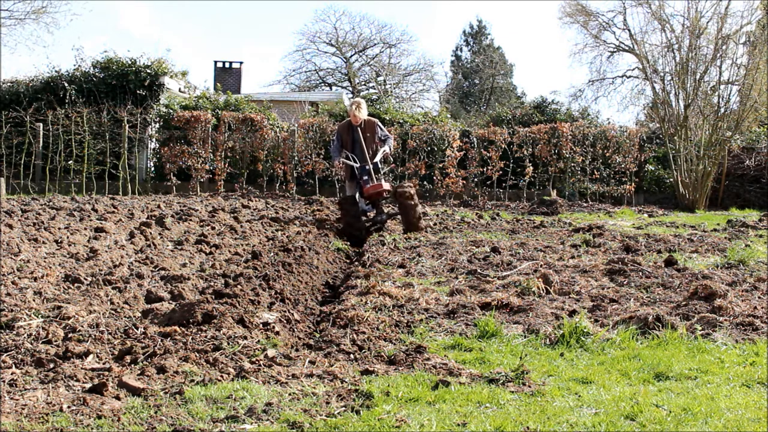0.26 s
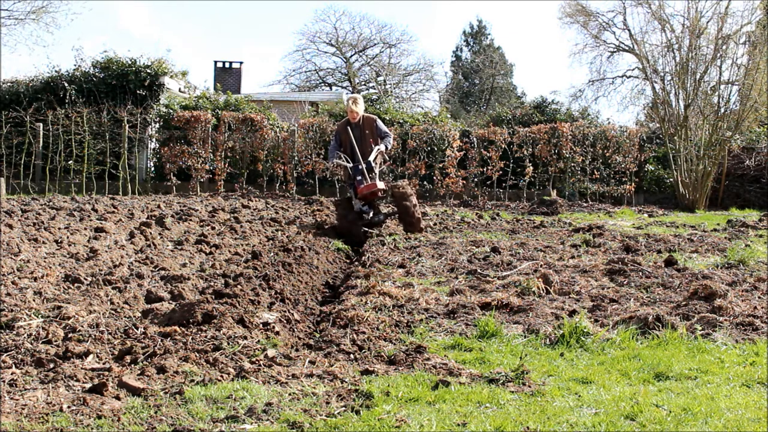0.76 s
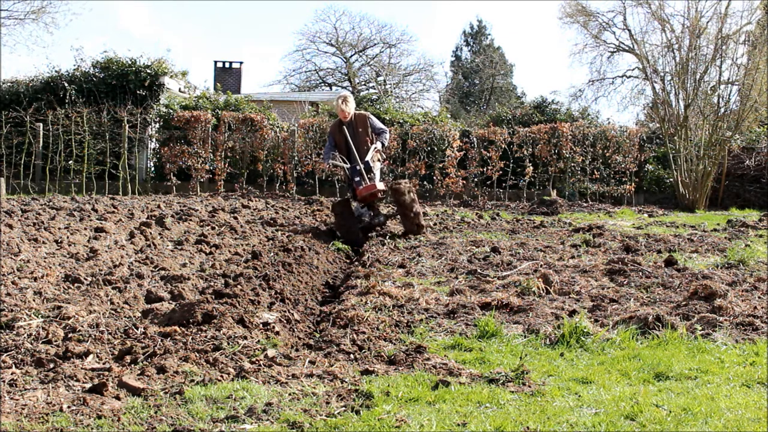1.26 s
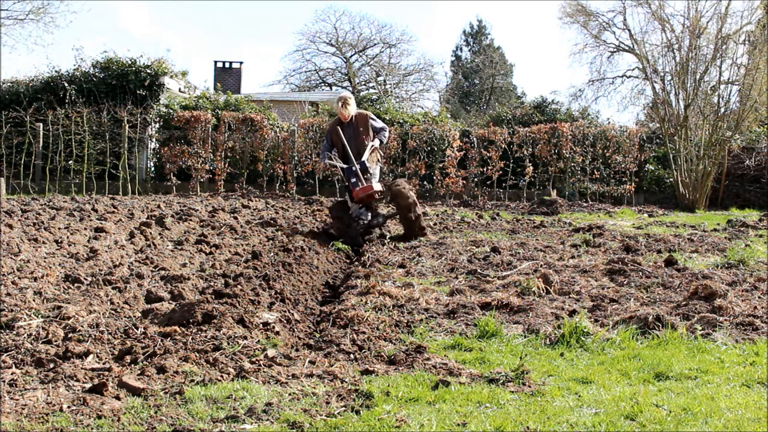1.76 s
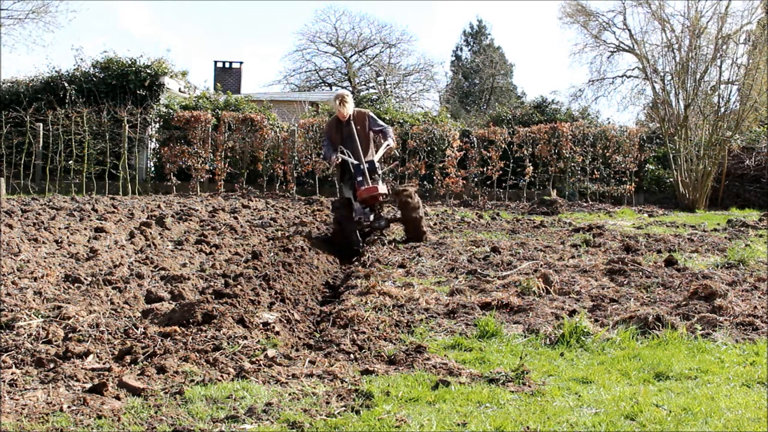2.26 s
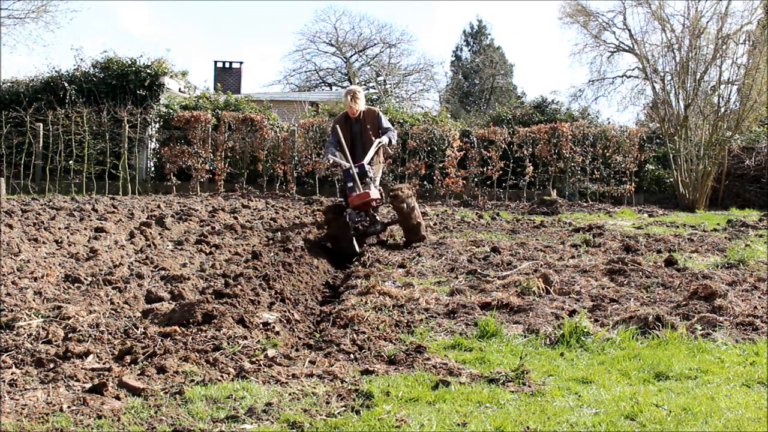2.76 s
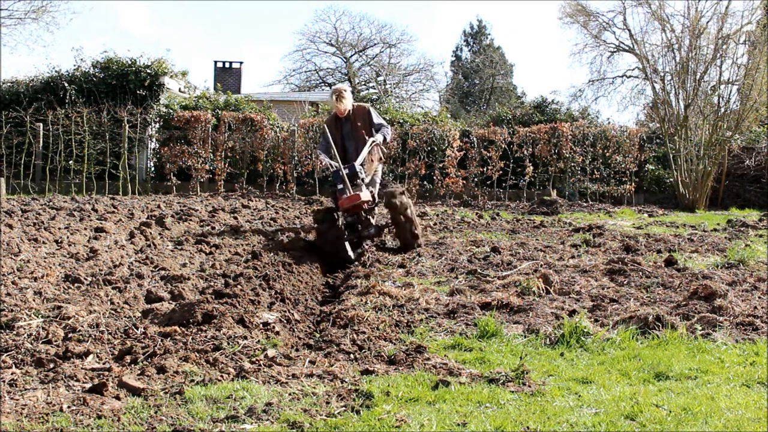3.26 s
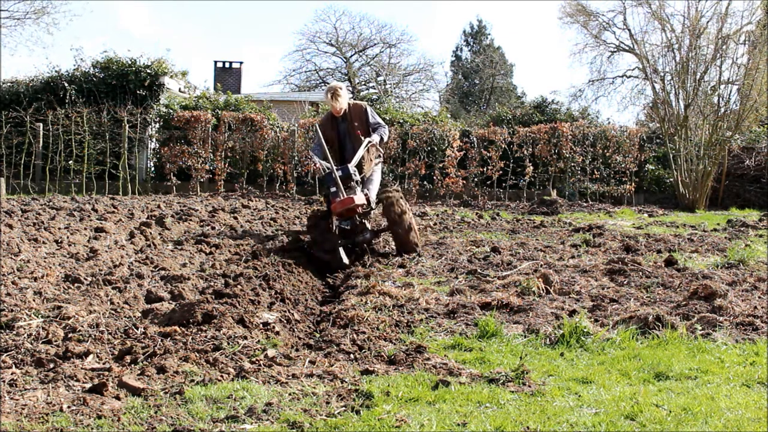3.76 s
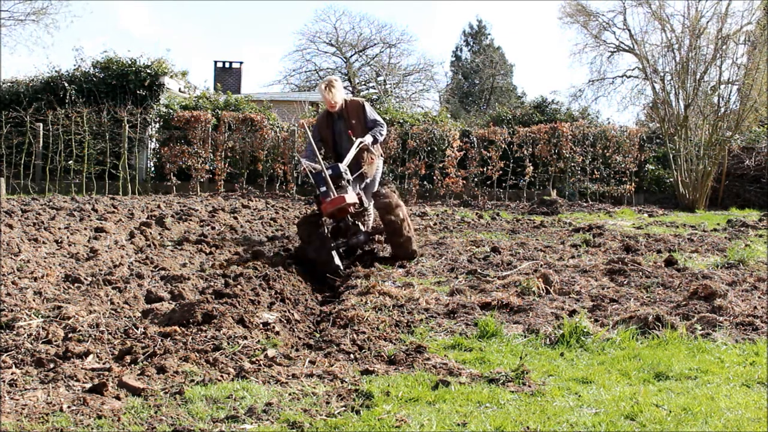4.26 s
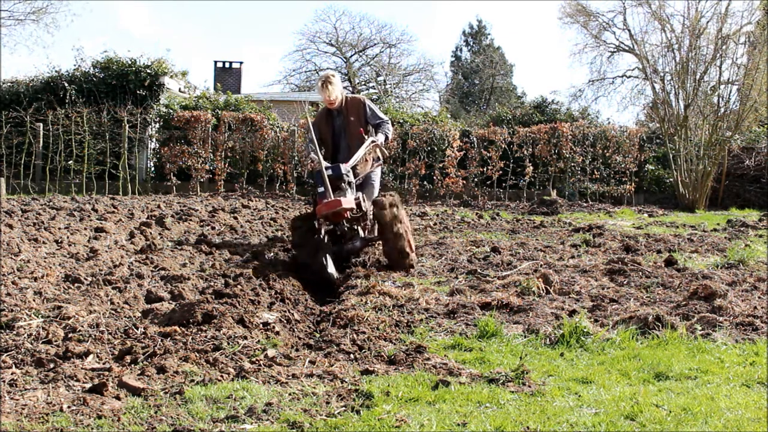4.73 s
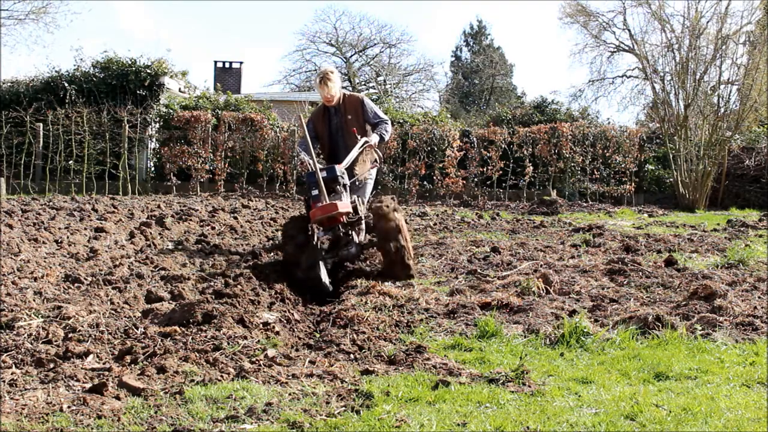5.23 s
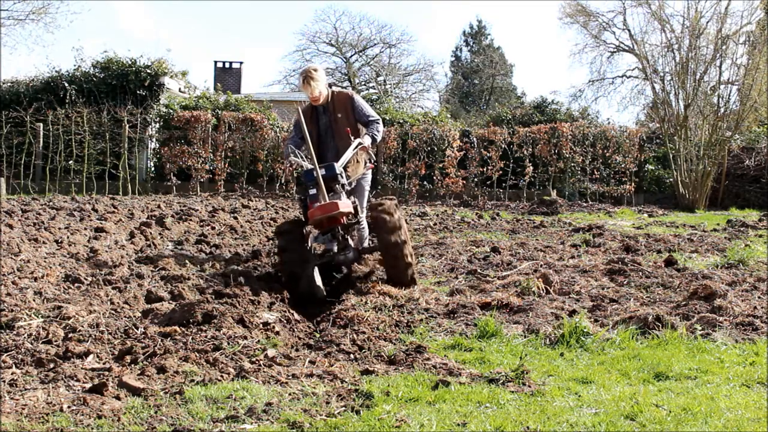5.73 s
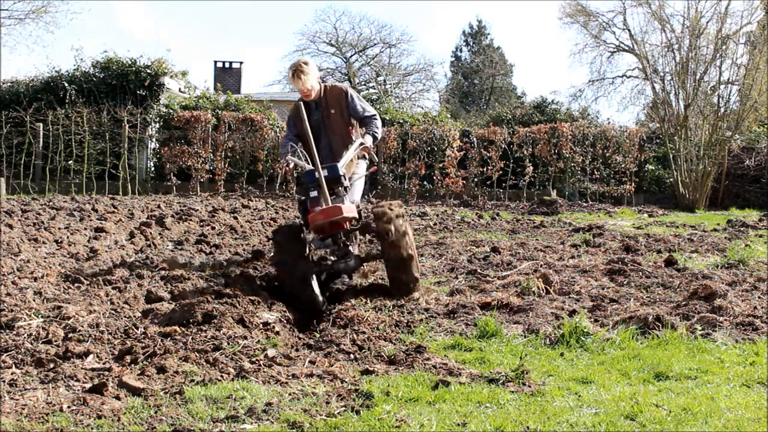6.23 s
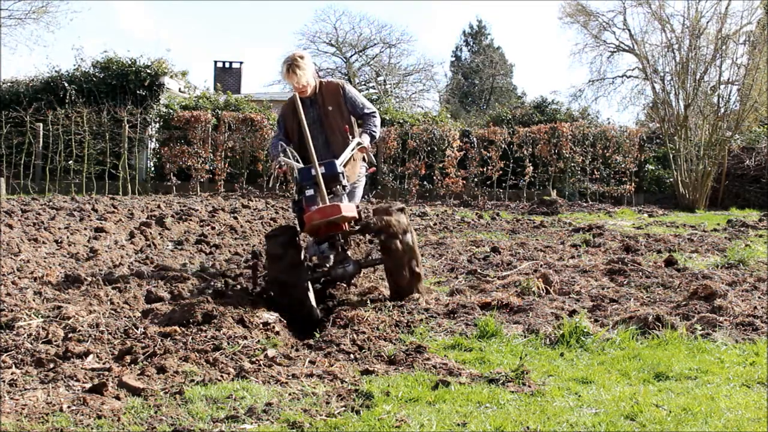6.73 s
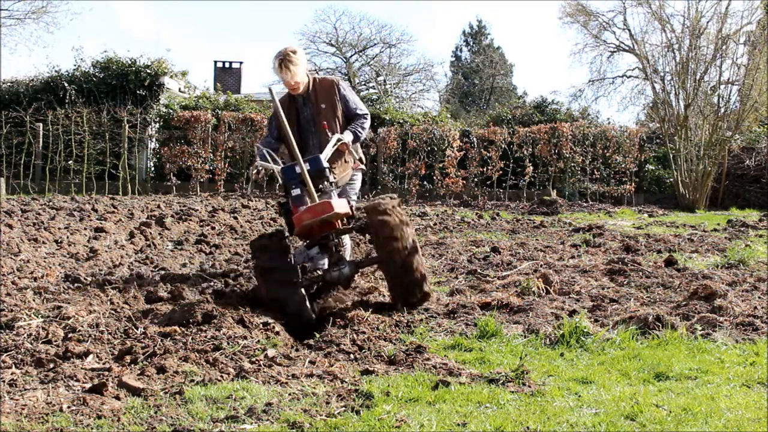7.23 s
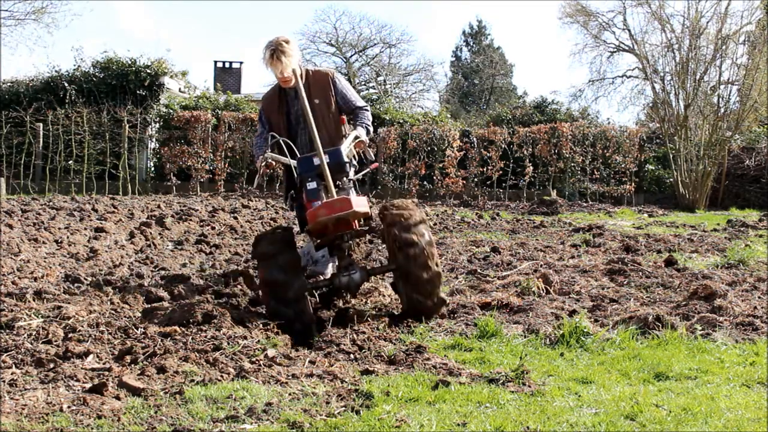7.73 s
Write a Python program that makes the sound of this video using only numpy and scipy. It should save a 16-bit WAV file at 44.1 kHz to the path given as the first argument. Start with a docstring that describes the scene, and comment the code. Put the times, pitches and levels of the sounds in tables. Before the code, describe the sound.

Walking tractor ploughing nearer: rapid hoarse exhaust chug, bending gear whine and metallic rattle, repeatedly swamped by low wind thuds overloading the microphone.

```python
"""Windy field: a one-cylinder four-stroke walking tractor ploughs toward a small stereo microphone.
Its governor hunts: speed sags, the throttle opens, the exhaust barks and the gear whine bends.
Tones make exhaust and whine; struck modes make clatter; filtered noise makes the roar.
Low noise and single puffs buffet the two microphone ports; loud moments trip a quick limiter."""
import sys
import numpy as np
from scipy import signal
from scipy.fft import rfft, irfft
from scipy.io import wavfile
from scipy.ndimage import uniform_filter1d

SR = 44100
rng = np.random.default_rng(int(sys.argv[2]) if len(sys.argv) > 2 else 0)


def wav_out(sig):
    """Save sig, one row per channel (or a flat mono array), as 16-bit PCM at SR to the path in sys.argv[1]."""
    wavfile.write(sys.argv[1], SR, np.round(np.clip(np.atleast_2d(sig).T, -1, 1) * 32767).astype(np.int16))


N = 352359
T = np.arange(N) / SR

# Governor swings, sag to sag. Each row: start in seconds, lowest firings per s, highest firings per s.
GOVERNOR_SWINGS = [(-0.054, 28.79, 30.0), (0.355, 27.99, 29.84), (0.783, 27.96, 29.98),
                   (1.178, 27.89, 29.64), (1.53, 27.72, 29.23), (1.918, 28.58, 29.09),
                   (2.205, 28.94, 29.36), (2.62, 28.96, 29.3), (2.902, 28.9, 30.13), (3.289, 28.02, 29.63),
                   (3.707, 28.5, 29.94), (4.123, 27.89, 29.22), (4.362, 28.96, 29.72),
                   (4.844, 28.14, 30.22), (5.227, 28.55, 29.93), (5.641, 27.65, 30.11),
                   (6.128, 27.42, 29.73), (6.568, 27.42, 29.78), (6.997, 27.54, 29.94),
                   (7.446, 27.68, 29.87), (7.904, 27.44, 29.99), (8.558, 29.0, 29.0)]
# Recorder gain on the machine, pushed down by wind, at times abruptly, and recovering.
# Each row: time in seconds, relative gain in dB.
RECORDER_GAIN = [(0, -27), (.85, -26.5), (1.3, -27.5), (1.34, -35), (1.51, -37.5), (1.54, -31.5),
                 (1.8, -35), (2.09, -29.5), (2.27, -44), (2.6, -42), (3.3, -33.5), (4.14, -27), (4.18, -26),
                 (5.05, -26), (5.1, -31), (5.35, -29.5), (6.54, -30.5), (6.61, -27.5), (7.99, -26)]
# Brief dips of the recorder gain. Each row: centre in seconds, depth in dB, bell width in seconds.
GAIN_DIPS = [(1.09, 4, 0.021), (1.18, 1, 0.0085), (1.38, 6.5, 0.017), (1.44, 0.5, 0.013), (1.69, 7, 0.041),
             (2.42, 2.5, 0.014), (3.27, 4, 0.015), (3.745, 4, 0.022), (4.3, 5, 0.02), (4.885, 6.5, 0.027),
             (5.08, 3.5, 0.028), (5.58, 3.5, 0.045), (6.16, 3.5, 0.018), (6.38, 1.5, 0.038),
             (7.86, 2, 0.024)]
# Mix as the machine nears. Each row: time in seconds, then changes in dB of lower whine, upper whine,
# roar, valves, upper exhaust tones, and bark of the open throttle.
APPROACH_MIX = [(0, 2.5, 0.5, 2.5, 1, -10, -2), (1.2, 2.5, -3, 0.5, -1, -5, 3),
                (2.5, 0.5, -9.5, 1, -2, -6, 2), (4, -0.5, -1.5, 1.5, 1, -3, 2.5),
                (5.5, -1.5, -2.5, 3, -1.5, -3, 3.5), (6.5, -0.8, -1.5, 1.5, -5.5, 2, 0),
                (7.2, -1.5, 0, 2, -4, -1, 3.5), (7.99, -1, 0.5, 1.5, -6, 2.5, 1)]
# Exhaust tones, throttle nearly shut. Each row: multiple of the firing rate, relative level in dB.
EXHAUST_SHUT = [(1, -30), (2, -8.5), (3, -22), (4, -10.5), (5, 1.9), (6, -7.5), (7, -8.5), (8, 0.5),
                (9, -7), (10, -6.5), (11, -10), (12, -10), (13, -38), (14, -23), (15, -19), (16, -19),
                (17, -16.5), (18, -17), (19, -16), (20, -26), (21, -15), (22, -16), (23, -18), (24, -36)]
# Exhaust tones, throttle wide open. Each row: multiple of the firing rate, relative level in dB.
EXHAUST_OPEN = [(1, -25), (2, -11.5), (3, -26), (4, -8), (5, -2), (6, -0.5), (7, -2.5), (8, -8), (9, 1.5),
                (10, -3.5), (11, -12), (12, -12.5), (13, -10), (14, -8), (15, -34), (16, -52), (17, -18.5),
                (18, -18.5), (19, -10), (20, -23), (21, -20), (22, -21), (23, -21), (24, -23)]
# Gear teeth near housing resonances. Each row: multiple of the firing rate, tremble width in Hz,
# relative level in dB, housing resonance in Hz, its half-width in Hz.
GEAR_TEETH = [(80.15, 60, -5.5, 2330, 200), (119.6, 75, -9, 3420, 150), (73.3, 80, -15, 2120, 120)]
# Casing and cover modes. Each row: frequency in Hz, width in Hz, relative level in dB.
CASING_MODES = [(1221, 223, -2.5), (1524, 271, -3), (1724, 63, 0.5), (2137, 182, -4), (2372, 138, -2),
                (2677, 160, -5.5), (2914, 80, -7), (3393, 242, -4.5), (4170, 500, -14), (4615, 106, -15.5),
                (4960, 89, -19), (5450, 130, -20.5), (5890, 133, -18), (6960, 250, -21), (8460, 200, -33.5),
                (9200, 330, -60), (10440, 190, -37), (12300, 600, -55), (14200, 500, -76)]
# Engine block modes rung by the firing. Each row: frequency in Hz, width in Hz,
# relative level in dB before weighting by root width.
BLOCK_MODES = [(1300, 66, -26), (1484, 76, 6.5), (3424, 69, -0.5), (4140, 95, -9.5), (4700, 120, -14),
               (5080, 100, -7.5), (5440, 130, -10), (5970, 88, -10), (6600, 130, -21), (7120, 180, -13),
               (8120, 200, -26), (8310, 110, -19.5)]
# Modes rung by a valve tick. Each row: frequency in Hz, width in Hz, relative level in dB.
VALVE_MODES = [(2748, 88, 15.5), (2730, 130, 11), (2610, 100, 0.5), (2914, 110, -2)]
# Bursts of hard knocking. Each row: centre in seconds, extra level in dB, bell width in seconds.
KNOCK_BURSTS = [(.12, 9, 0.1), (.43, 2, .08), (1.21, 6.5, 0.034), (3.34, 9, .04), (3.69, 11.5, 0.058),
                (4.19, 7.5, 0.04), (4.84, 11, 0.048), (5.74, 5, .04), (6.21, 8.5, 0.034), (6.62, 6, 0.03),
                (7.055, 11.5, 0.082), (7.48, 6, 0.1), (7.93, 5, .05)]
# Roar of cooling air and exhaust gas. Each row: frequency in Hz, relative density in dB per Hz.
ROAR_SPECTRUM = [(25, -22), (60, -13.5), (150, -22), (280, -20), (450, -21), (700, -22), (1400, -33.5),
                 (3000, -42), (5000, -37.5), (9000, -44.5), (13000, -57.5), (15600, -66)]
# Bands cancelled by the soil echo. Each row: frequency in Hz, half-width in Hz, depth 0-1.
SOIL_NOTCHES = [(665, 74, 0.52), (1920, 58, 0.15), (3170, 34, 0.37), (4310, 96, 0), (6270, 65, 0.5)]
# Left-right likeness of the machine. Each row: frequency in Hz, likeness 0-1.
PORT_LIKENESS = [(60, 0.65), (300, 1), (1400, 0.98), (2400, 0.9), (3400, 0.82), (6800, 0.74), (15000, 0.83)]
# Channel balance of the machine. Each row: frequency in Hz, left minus right in dB.
PORT_BALANCE = [(60, 7.5), (180, 0), (550, -3), (1650, -2), (4970, 1.5), (15000, -0.5)]
# Gusts. Each row: start in seconds, length in seconds, relative level in dB,
# level in dB of the part above the thud range relative to that.
GUST_ROWS = [(0.023, 0.26, -27, -16), (0.552, 0.38, -29, -15), (0.974, 0.21, -35, -21),
             (1.2, 0.28, -24.5, -15), (1.52, 0.081, -19, -11.5), (1.629, 0.058, -21.5, 3),
             (1.705, 0.1, -28, -5.5), (1.84, 0.29, -30, -15), (2.113, 0.21, -26, 5),
             (2.352, 0.51, -30, 4.5), (3.222, 0.48, -39, -22), (3.64, 0.11, -29.5, -11),
             (3.844, 0.55, -38, -16), (4.235, 0.068, -20, -9), (4.398, 0.4, -33, -16),
             (4.807, 0.19, -23.5, -16), (5.005, 0.428, -21, -11.5), (5.493, 0.4, -32, -17),
             (5.91, 0.34, -29.5, 2.5), (6.269, 0.081, -27, 8), (6.405, 0.21, -27, 0.5),
             (6.645, 0.27, -31, -13), (7.243, 0.29, -32, -12), (7.734, 0.14, -26.5, -9)]
# Buffeting noise. Each row: frequency in Hz, relative density in dB per Hz.
BUFFET_SPECTRUM = [(18, -54), (30, -37), (47, -14.5), (112, 5), (265, 2), (377, -5), (650, -17.5),
                   (850, -28), (1270, -33), (2000, -46), (2600, -92), (4400, -120)]
# Single puffs. Each row: time in seconds, relative level in dB, centre pitch in Hz, nominal length in ms,
# lean from right -1 to left +1.
PUFF_ROWS = [(0.203, -10, 206, 5.5, -0.17), (0.25, -8, 140, 5, -0.17), (0.865, -14, 156, 11, -0.37),
             (1.081, -11.5, 235, 2.5, -0.7), (1.289, -15, 155, 13, 0.37), (1.306, -10, 221, 8.3, 0.068),
             (1.327, -9.5, 210, 21, -0.44), (1.353, -10, 297, 4.1, -0.39), (1.427, -11.5, 222, 7.6, -0.51),
             (1.48, -11.5, 191, 9.1, -0.32), (1.552, -11, 227, 7.1, -0.41), (1.583, -17, 189, 9.1, 0.2),
             (1.623, -16, 210, 6.5, 0.2), (1.637, -12, 300, 3.1, -0.42), (1.664, -14, 420, 2.7, -0.47),
             (1.652, -10.5, 338, 14, -0.27), (1.679, -6, 282, 1.8, -0.39), (1.753, -23, 277, 5.3, 0.38),
             (1.777, -18, 196, 5.6, 0.47), (2.127, -18.5, 230, 8.8, 0.48), (2.152, -15.5, 289, 8.9, -0.29),
             (2.234, -12.5, 344, 5.1, -0.36), (2.265, -16, 420, 3.4, -0.28), (2.31, -17, 415, 4.9, -0.42),
             (2.333, -20, 384, 9.1, -0.41), (2.361, -13, 480, 2.4, -0.47), (2.397, -8.5, 344, 2.8, -0.25),
             (2.415, -17, 257, 7.1, -0.29), (2.457, -17.5, 373, 3.9, -0.39), (2.48, -18.5, 320, 14, -0.47),
             (2.509, -21, 400, 1.6, -0.51), (2.537, -17.5, 258, 4.4, 0.8), (2.558, -11, 380, 1.9, -0.3),
             (2.586, -17, 380, 2.3, -0.39), (2.618, -12.5, 176, 15, 0.24), (2.642, -20, 348, 3.6, -0.28),
             (2.685, -18, 205, 11, -0.52), (2.708, -16.5, 323, 5.4, -0.33), (2.74, -20, 320, 7.1, -0.35),
             (2.77, -7, 226, 6, -0.12), (2.783, -20, 380, 3.5, -0.29), (2.84, -19, 196, 26, -0.51),
             (3.402, -20.5, 126, 39, 0.39), (3.567, -12.5, 187, 4.2, 0.49), (3.726, -7, 211, 3.2, 0.51),
             (4.272, -5, 203, 7.9, 0.26), (4.845, -17, 125, 8.5, 0.53), (4.867, -7.5, 207, 11, 0.19),
             (5.049, -9, 194, 16, -0.33), (5.09, -10, 182, 9.5, -0.49), (5.212, -11.5, 183, 39, -0.27),
             (5.528, -21, 139, 11, 0.43), (5.547, -15.5, 240, 2.4, 1), (5.558, -14, 260, 17, -0.37),
             (5.602, -9, 257, 3.7, -0.43), (5.667, -14, 142, 14, 0.53), (5.689, -13, 197, 6.1, -0.16),
             (5.766, -16, 222, 7.4, -0.44), (5.834, -16, 197, 8.2, -0.51), (5.922, -17, 302, 3.4, -0.73),
             (5.938, -20, 255, 15, -0.41), (5.96, -14, 367, 3.9, -0.44), (5.977, -17, 420, 2.2, -0.63),
             (6.047, -6.5, 234, 2.5, -0.27), (6.098, -10, 240, 4.1, 0.13), (6.121, -17, 280, 5, -0.6),
             (6.147, -9.5, 178, 8.2, 0.38), (6.263, -22, 330, 3.8, -0.3), (6.289, -15, 330, 5.4, 0.053),
             (6.32, -14, 427, 2, -0.48), (6.484, -15, 284, 1.7, -0.74), (7.309, -20.5, 160, 15, -0.5),
             (7.816, -12, 156, 9.4, 0.28), (7.835, -10, 256, 3.7, -0.21)]

CLIMB_SHARE = .443  # of a swing, spent gaining speed
THROTTLE_LAG_S, PULL_LAG_S, PULL_DB = 0.027, 0.087, 1  # the pull arrives later and lifts the clatter
RATTLES_PER_S, RATTLE_DB = 120, -12  # stray knocks on the block
SWELL_S, LULL_DB = 0.049, -48  # gust rise and fall; wind between gusts
LIMIT_DB, RELEASE_DB_PER_S, LIMITER_LAG_S = -15.5, 102.0, .008
OVERLOAD, BASS_CUT_HZ, EDGE_HZ = .52, 40, 15620


def tractor():
    """Exhaust, gear whine and clatter share one shaft speed; the throttle answers its sags."""
    hz = speed()
    throttle, pull = opening(hz, THROTTLE_LAG_S), opening(hz, PULL_LAG_S)
    turns = np.cumsum(hz) / SR + .92  # one turn = one firing cycle
    s, *columns = np.transpose(APPROACH_MIX)
    low_db, high_db, roar_db, valve_db, upper_db, bark_db = (np.interp(T, s, column) for column in columns)
    whine = gear_whine(hz, turns, pull, low_db, high_db)
    sound = gain_of(-5.5 + bark_db * throttle) * exhaust(turns, throttle, upper_db) + whine
    sound = sound + gain_of(PULL_DB * pull - 0.63) * clatter(turns, pull, roar_db, valve_db)
    return spread(sound * gain_of(recorder_gain_db()))


def speed():
    """Firings per s: each swing climbs from its low to a narrow top and falls back into a broad sag."""
    s, low, top = np.transpose(GOVERNOR_SWINGS)
    tops_s = s + CLIMB_SHARE * np.diff(s, append=s[-1] + 1)
    knots = np.ravel([s, tops_s], "F")
    step = np.interp(T, knots, np.arange(len(knots)))
    height = abs(np.sin(np.pi * step / 2)) ** 1.29  # 0 in the sags, 1 at the tops
    swing = (step // 2).astype(int)
    sag = np.round(step / 2).astype(int)
    return low[sag] + height * (top[swing] - low[sag])


def opening(hz, lag_s):
    """Throttle opening 0-1, set by how slow the shaft was lag_s ago."""
    return np.clip((29.1 - np.interp(T - lag_s, T, hz)) / 0.66, 0, 1)


def exhaust(turns, throttle, upper_db):
    """Tones at multiples of the firing rate; uneven burns shake their strength and timing."""
    turns = turns + .0012 * drift(.04)
    out = np.zeros(N)
    for (k, shut_db), (_, open_db) in zip(EXHAUST_SHUT, EXHAUST_OPEN):
        db = (1 - throttle) * shut_db + throttle * open_db
        db = db + 1.1 * drift(.15) + upper_db * (k > 10)
        phase = k * turns - k ** 2 / 6  # three even puffs a cycle
        out += gain_of(db) * np.cos(2 * np.pi * phase)
    return out


def gear_whine(hz, turns, pull, low_db, high_db):
    """Tooth-meshing tones follow the shaft and grow near the housing resonances."""
    shaft = hz * (1 + .014 * np.sin(2 * np.pi * turns))  # firing kicks it, compression slows it
    sag = np.clip((28.2 - np.interp(T - .02, T, hz)) / .5, 0, 1)
    shaft = shaft * (1 - .03 * sag)  # the belt slips in deep sags
    whine = np.zeros(N)
    for (k, width, db, housing, span), mix_db in zip(GEAR_TEETH, (low_db, high_db, low_db)):
        resonance = 1 / (1 + ((k * hz - housing) / span) ** 2)
        whine += gain_of(db + mix_db - 1.7 * pull) * whistle(k * shaft, width) * resonance
    return whine * gain_of(1.6 * np.cos(2 * np.pi * (turns - .9)))  # teeth load up once a cycle


def clatter(turns, throttle, roar_db, valve_db):
    """Sums casing rattle, gas and air roar, valve ticks and block ring, all paced by the firing cycle."""
    cycle = np.floor(turns).astype(int)
    phase = turns % 1
    burn_db, tick_db = rng.standard_normal((cycle[-1] + 2, 2)).T
    burn = gain_of(2 * burn_db[cycle] + 5 * throttle + bells(KNOCK_BURSTS))
    knock = burn * np.exp(-phase / 0.22)
    chatter = gain_of(1.4 * drift(0.004))  # loose parts rattle in fine grains
    casing_noise, roar_noise = rng.standard_normal((2, N))
    habit = evened(np.interp(phase, np.linspace(0, 1, 1500), rng.standard_normal(1500)))
    casing_noise = .75 * casing_noise + .66 * habit  # part repeats every cycle
    casing = ring((chatter + 0.093 * knock) * casing_noise, CASING_MODES)
    roar = evened(coloured((chatter + 0.24 * knock) * roar_noise, ROAR_SPECTRUM))
    ticks = gain_of(valve_db - 13.5) * valve_ticks(turns, tick_db)
    block = gain_of(-14.5) * block_ring(burn, phase, cycle)
    return gain_of(-2) * casing + gain_of(roar_db - 10.5) * roar + ticks + block


def valve_ticks(turns, tick_db):
    """A short, uneven blow rings the valve modes just before each firing."""
    seat = np.floor(turns + 0.18).astype(int)
    ticks = gain_of(2 * tick_db[seat] + 2 * drift(.12)) * np.diff(seat, prepend=seat[0])
    return ring(signal.oaconvolve(ticks, np.hanning(7))[:N], VALVE_MODES)


def block_ring(burn, phase, cycle):
    """Combustion cracks and stray knocks strike the block; each firing favours other modes."""
    crack = phase / .05 * np.exp(-phase / .05)  # swells for a moment, then dies
    stray = gain_of(RATTLE_DB + 2.7 * rng.standard_normal(N)) * (rng.random(N) < RATTLES_PER_S / SR)
    force = burn * crack + signal.oaconvolve(stray, np.hanning(90))[:N]
    blows = force * rng.standard_normal(N)
    blows = signal.oaconvolve(blows, np.hanning(5))[:N]  # softened edge
    favour = gain_of(4.5 * rng.standard_normal((cycle[-1] + 2, len(BLOCK_MODES))))[cycle].T
    block = np.zeros(N)
    for (hz, width, db), share in zip(BLOCK_MODES, favour):
        block += gain_of(db) * np.sqrt(width) * ring(blows * share, [(hz, width, 0)])
    return evened(block)


def recorder_gain_db():
    """Recorder gain on the machine: wind pushes it down, it recovers, with brief bell-shaped dips."""
    return np.interp(T, *np.transpose(RECORDER_GAIN)) - bells(GAIN_DIPS)


def spread(x):
    """A common part, and a diffuse decaying noise tail with opposite signs that widens the sound."""
    hz = np.fft.rfftfreq(N, 1 / SR)
    same = np.clip(read(PORT_LIKENESS, hz), 0, 1)
    left = gain_of(read(PORT_BALANCE, hz) / 2)
    scatter = rng.standard_normal(12000) * np.exp(-np.arange(12000) / 3000)
    tail = rfft(scatter / np.linalg.norm(scatter), N)
    soil = np.prod([1 - np.clip(d, 0, 1) / (1 + ((hz - f) / w) ** 2) for f, w, d in SOIL_NOTCHES], 0)
    notched = rfft(x) * soil
    mid = notched * np.sqrt((1 + same) / 2)
    side = notched * tail * np.sqrt((1 - same) / 2)
    return irfft(np.array([(mid + side) * left, (mid - side) / left]), N)


def wind():
    """Buffeting plus puffs, as an opposed and a common part of the pressure at the two ports."""
    parts = buffet(), buffet()
    opposed, shared = parts
    parts = np.array([opposed, -.25 * opposed + 0.49 * shared])
    add_puffs(parts)
    opposed, common = parts
    return np.array([common + opposed, common - opposed])


def buffet():
    """Lumpy low noise; each gust swells, holds and dies, with its own share of upper part."""
    lumps, spikes = gain_of(3.5 * drift(.012)), gain_of(4 * drift(.005))
    noise = evened(coloured(rng.standard_normal(N), BUFFET_SPECTRUM))
    thud = coloured(noise, [(120, 0), (260, -20), (1000, -60)])
    low = high = gain_of(LULL_DB)
    for s, length, db, bright_db in GUST_ROWS:
        shape = np.clip(np.minimum(T - s, s + length - T) / SWELL_S + .5, 0, 1)
        low = low + gain_of(db) * shape
        high = high + gain_of(db + bright_db) * shape
    return low * evened(lumps) * thud + high * evened(spikes) * (noise - thud)


def add_puffs(parts):
    """Each puff is a short pressure swing of bending pitch, rising fast and falling slower."""
    luck = rng.random((len(PUFF_ROWS), 2))
    for (s, db, hz, ms, lean), (start, bend) in zip(PUFF_ROWS, luck):
        at = np.arange(max(round((s - .1) * SR), 0), min(round((s + .14) * SR), N))
        t = at / SR - s
        shape = np.exp(-(t / (np.where(t < 0, .0004, .0008) * ms)) ** 2)
        swing = shape * np.sin(2 * np.pi * (start + hz * t - 2500 * (bend - .3) * t ** 2))
        puff = gain_of(db) * (swing + 0.47 * swing ** 2 + 0.1 * swing ** 3)  # sharp crests
        parts[:, at] += np.outer([1, lean], puff)


def whistle(hz, width):
    """A tone whose pitch and strength tremble: a steady phasor plus slow complex noise."""
    r = np.exp(-np.pi * width / SR)
    noise = rng.standard_normal(N) + 1j * rng.standard_normal(N)
    slow = signal.lfilter([1], [1, -2 * r, r * r], noise)
    phasor = 2.0 + slow / np.std(slow)
    return evened((phasor * np.exp(2j * np.pi * np.cumsum(hz) / SR)).real)


def ring(x, modes):
    """x through decaying modes of alternating sign, scaled to rms 1."""
    t = np.arange(3000) / SR
    taps = np.zeros(3000)
    for k, (hz, width, db) in enumerate(modes):
        decay = np.exp(-np.pi * width * t)
        taps += (-1) ** k * gain_of(db) * width * decay * np.sin(2 * np.pi * hz * t)
    return evened(signal.oaconvolve(x, taps)[:N])


def bells(rows):
    """Sum of bell-shaped bumps in time, in dB."""
    return sum(db * np.exp(-((T - s) / width) ** 2) for s, db, width in rows)


def drift(seconds):
    """Slow chance: twice-averaged noise of rms 1."""
    size = round(seconds * SR)
    return evened(uniform_filter1d(uniform_filter1d(rng.standard_normal(N), size), size))


def coloured(x, points):
    """Filters x by a spectrum table in dB."""
    return irfft(rfft(x) * gain_of(read(points, np.fft.rfftfreq(N, 1 / SR))), N)


def read(points, hz):
    """A spectrum table read on a log-frequency axis."""
    f, value = np.transpose(points)
    return np.interp(np.log(hz + 1), np.log(f + 1), value)


def evened(x):
    """Scales to rms 1."""
    return x / np.sqrt(np.mean(x ** 2) + 1e-20)


def gain_of(db):
    """Decibels to gain."""
    return 10 ** (np.asarray(db) / 20)


def scene():
    """Tractor and wind."""
    return tractor() + wind()


def record(dry):
    """A limiter reacts just after each peak and lets go quickly; then overload and the band limits."""
    level_db = 20 * np.log10(uniform_filter1d(abs(dry).max(0), 150) + 1e-6)
    fall_db = T * RELEASE_DB_PER_S
    held_db = np.maximum.accumulate(level_db + fall_db) - fall_db
    over_db = np.clip(held_db - LIMIT_DB, 0, 30)
    duck_db = 0.58 * uniform_filter1d(np.interp(T - LIMITER_LAG_S, T, over_db), 300)
    limited = dry / gain_of(duck_db)
    limited = limited / (1 + (limited / OVERLOAD) ** 6) ** (1 / 6)  # the input stage tops out
    limited = signal.sosfilt(signal.butter(2, BASS_CUT_HZ, "high", fs=SR, output="sos"), limited)
    lowpass = signal.firwin(1023, EDGE_HZ, window=("kaiser", 9), fs=SR)
    return signal.oaconvolve(limited, lowpass[None], "same")


dry = scene()
out = record(dry)
wav_out(out)
```